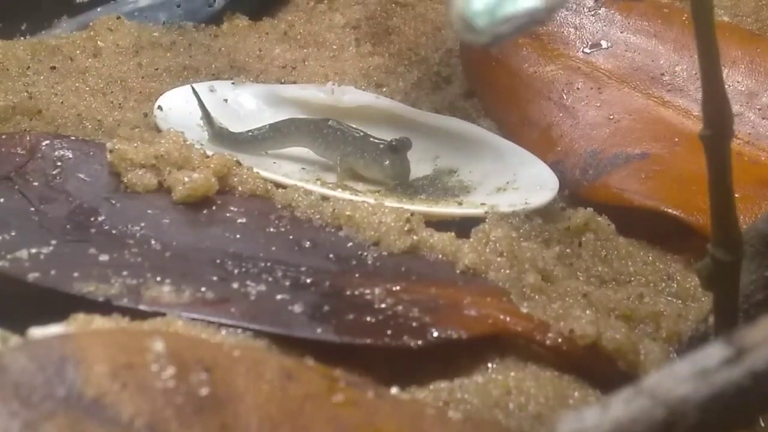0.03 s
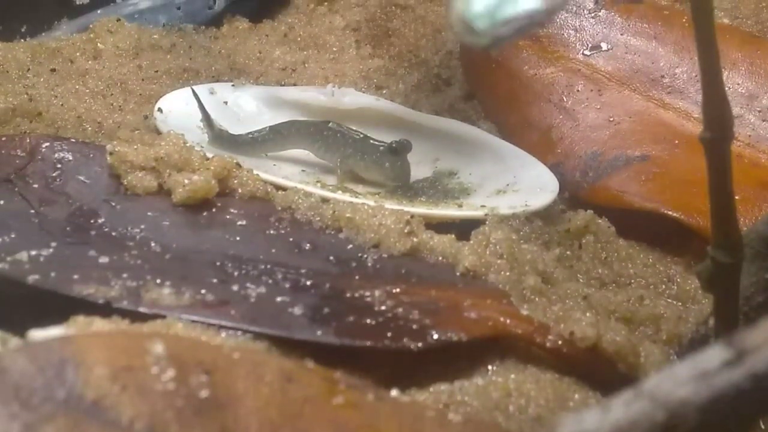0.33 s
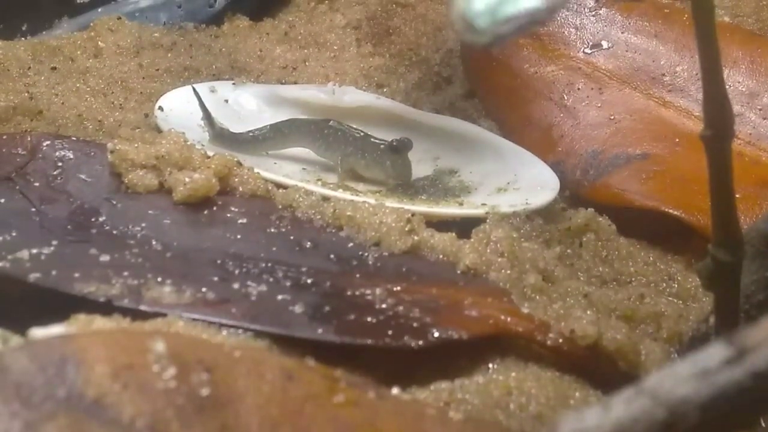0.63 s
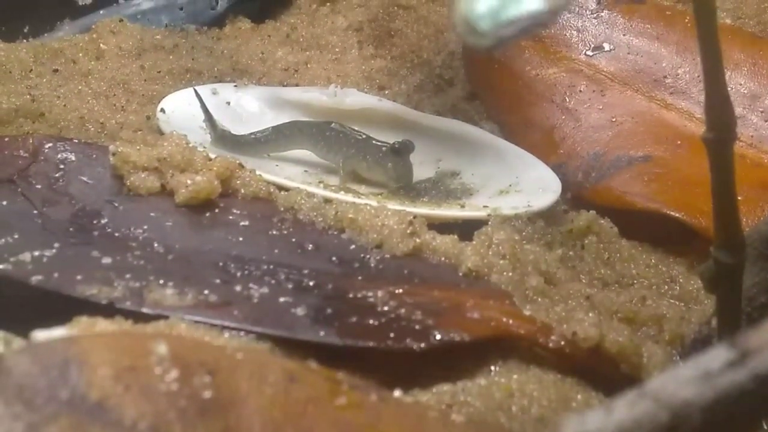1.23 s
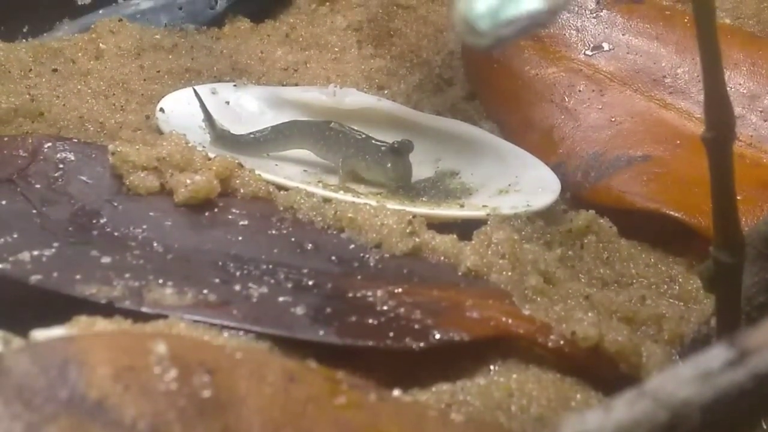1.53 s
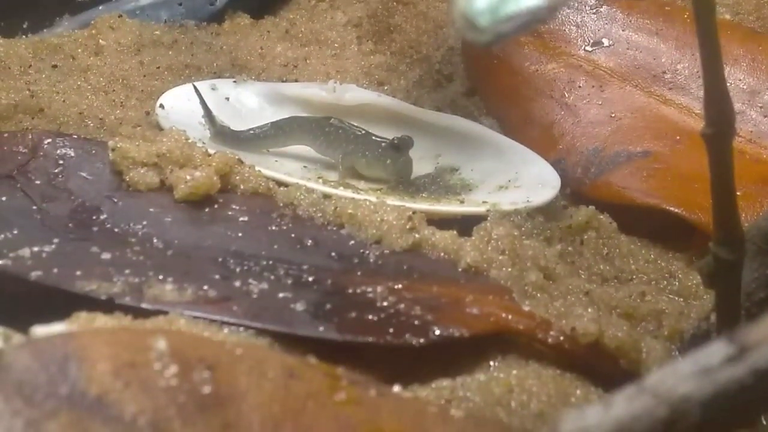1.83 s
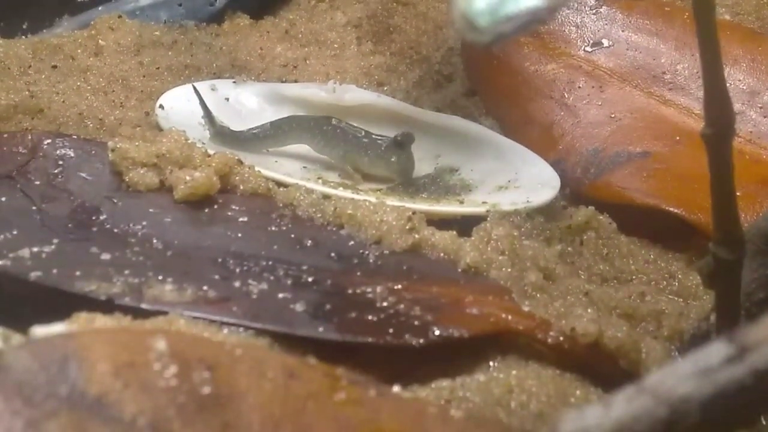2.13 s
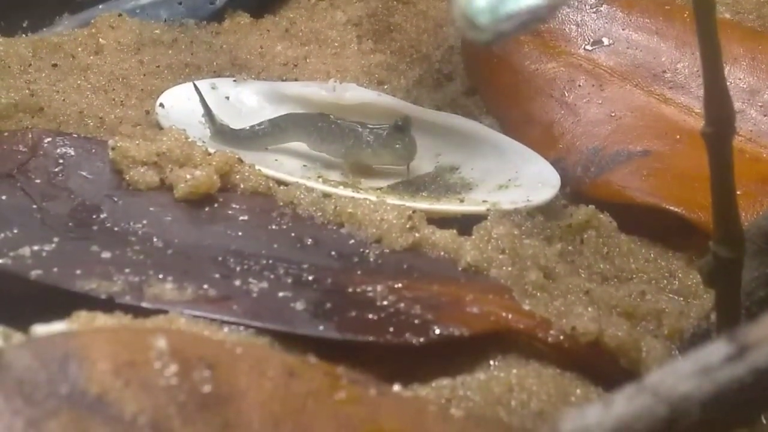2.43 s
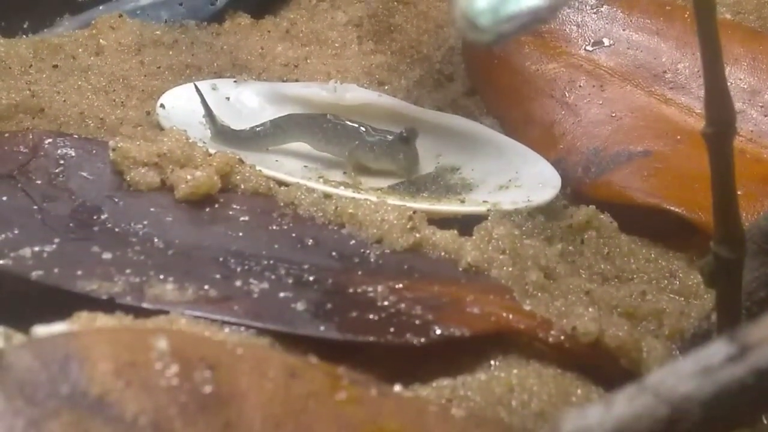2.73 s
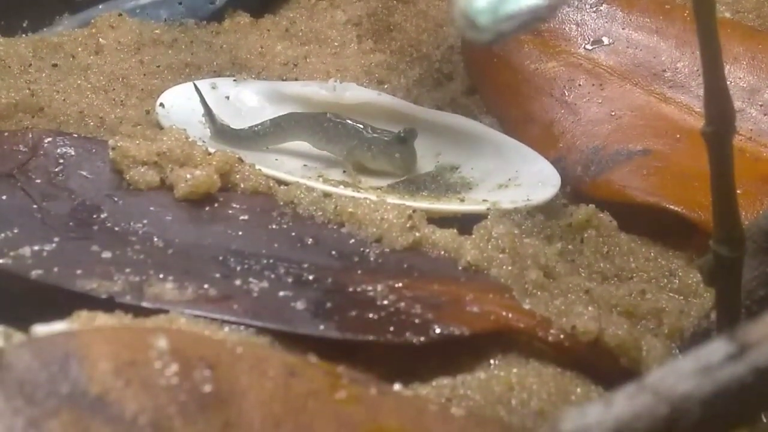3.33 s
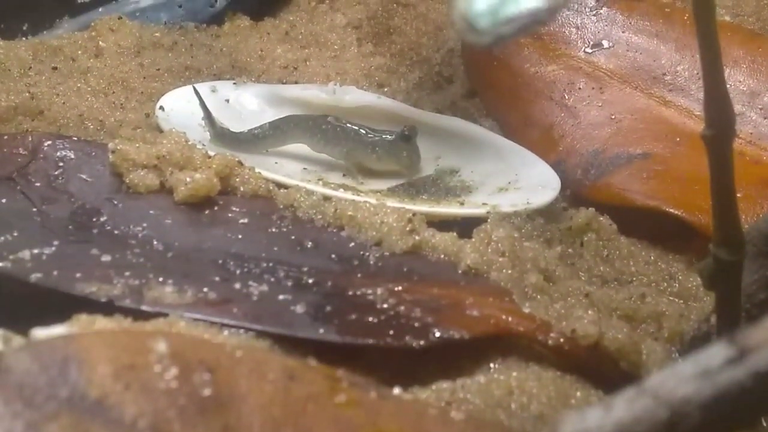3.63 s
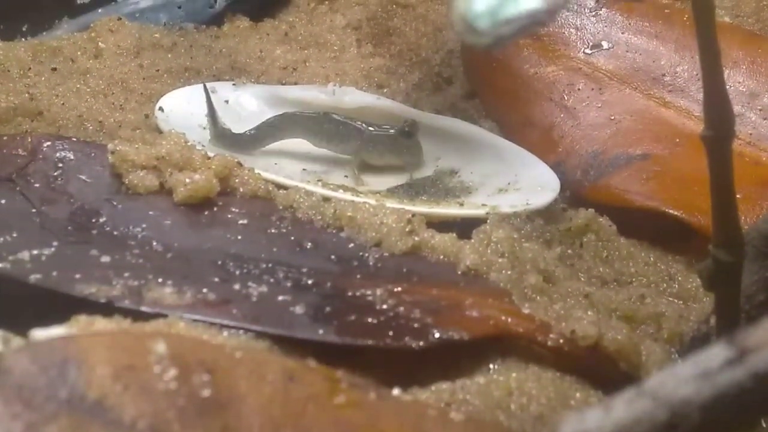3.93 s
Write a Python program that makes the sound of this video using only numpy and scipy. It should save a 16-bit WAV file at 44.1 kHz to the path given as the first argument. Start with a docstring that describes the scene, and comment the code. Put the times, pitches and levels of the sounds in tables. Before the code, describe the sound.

A steady rush of air and low motor hum, with one small click, in a quiet room.

```python
"""From the start, electric pumps or fans hum under a steady rush of turbulent air in a quiet room.
Motor tones beat slowly against the mains hum. The camera widens the stereo picture of the rush's
treble by feeding each side, late and inverted, into the other.
At 1.6 s one small click sounds close by, a snap with a damped knock; two fainter ticks follow
at 3.1 and 3.4 s, while the rush and hum carry on to the end."""
import sys
import numpy as np
from scipy import signal
from scipy.fft import rfft, irfft
from scipy.io import wavfile
from scipy.ndimage import uniform_filter1d

SR = 44100
rng = np.random.default_rng(int(sys.argv[2]) if len(sys.argv) > 2 else 0)


def transcribe(u):
    """Save the signal u as a 16-bit wav file named by the first command-line argument.

    u: samples, shape (n,) or (channels, n), limited to [-1, 1]; the rate is SR.
    q: integer samples, one column per channel.
    """
    v = np.clip(np.atleast_2d(u).T, -1, 1)
    q = np.round(v * 32767).astype(np.int16)
    wavfile.write(sys.argv[1], SR, q)


N = 176400


def gain_of(db):
    """Amplitude grows tenfold for every 20 decibels."""
    return 10 ** (np.asarray(db) / 20)


def unit_rms(x):
    """Division by the root mean square gives a signal unit power."""
    return x / np.sqrt(np.mean(x ** 2) + 1e-20)


def curve_at(points, hz):
    """Interpolation on a logarithmic frequency axis, as the ear hears pitch by ratio."""
    points_hz, values = np.transpose(points)
    return np.interp(np.log(hz + 1), np.log(points_hz + 1), values)


def pan_gains(pan_db):
    """Constant-power panning: two gains, the left pan_db above the right."""
    pair = np.array([gain_of(pan_db / 2), gain_of(-pan_db / 2)])
    return pair / np.sqrt(np.mean(pair ** 2, axis=0))


def drift(top_hz, t):
    """Slow sinusoids of random phase superpose into a wandering of unit power."""
    rates_hz = top_hz * np.geomspace(1 / 10, 1, 20)
    coarse_t = np.linspace(0, t[-1], 400)
    wander = sum(np.sin(2 * np.pi * (hz * coarse_t + rng.random())) for hz in rates_hz)
    return np.interp(t, coarse_t, unit_rms(wander))


def stereo_coherence(hz, widen_from_hz=820, squareness=1.08, quadrature=0.53):
    """Complex left-right coherence: the room sets the bass; delayed cross-feed combs the treble."""
    # likeness of the two sides in the room's bass: frequency_hz, correlation
    room_correlation = [(30, 0.54), (70, 0.85), (100, 0.8), (160, 0.87), (205, 0.17), (260, 0.84),
                        (350, 0.78), (440, 0.77), (530, 0.068), (600, 0.87), (700, 0.57), (900, 0.58)]
    # depth of the ripple that the widening gives: frequency_hz, depth
    comb_depth = [(900, 0.86), (2000, 0.9), (3100, 0.91), (5000, 0.84), (8000, 0.48), (13000, 0.5)]
    # lateness of the cross-feed between the sides: frequency_hz, delay_s
    cross_delay = [(900, .00052), (1450, .00053), (2050, .000495), (2450, .000503), (3500, .000485)]
    lag_rad = 2 * np.pi * hz * curve_at(cross_delay, hz)
    in_phase = np.tanh(squareness * np.cos(lag_rad)) / np.tanh(squareness)
    comb = -in_phase - 1j * quadrature * np.sin(lag_rad)  # negative: the feed is inverted
    coherence = np.where(hz < widen_from_hz, curve_at(room_correlation, hz), curve_at(comb_depth, hz) * comb)
    return coherence / np.maximum(abs(coherence), 1)


def turbulence(air, depth_db=0.7, frame=512):
    """Turbulence modulates the flow noise: patches of its spectrum come and go a little."""
    spectra = signal.stft(air, nperseg=frame)[2]
    patches = rng.standard_normal(spectra.shape[1:])
    patches = uniform_filter1d(patches, size=9, axis=0)  # smooth across frequency
    patches = uniform_filter1d(patches, size=12, axis=1)  # and across time
    return signal.istft(spectra * gain_of(depth_db * unit_rms(patches)), nperseg=frame)[1][:, :N]


def air_rush(t, trim_db=-0.22, swell_db=0.16):
    """Turbulent air radiates broadband noise, which arrives from all around, only partly coherent."""
    # spectrum of the moving air before the trim: frequency_hz, density_db_per_hz
    air_spectrum = [(20, -91.6), (45, -85.3), (75, -80.7), (95, -71.2), (135, -67.3), (175, -68.0),
                    (205, -73.4), (255, -68.1), (295, -69.6), (325, -64.4), (365, -67.0), (420, -69.2),
                    (580, -67.1), (720, -66.0), (900, -67.3), (1200, -72.7), (1480, -73.5), (1570, -70.7),
                    (1750, -75.5), (2030, -75.6), (2400, -79.4), (2700, -79.5), (3050, -83.2),
                    (3450, -84.9), (4500, -92.0), (5000, -95.0), (5750, -96.0), (6150, -100.2),
                    (7000, -101.7), (10200, -110.8), (11000, -110.8), (12300, -116.8), (14200, -119.3)]
    # where the rush sits: frequency_hz, left_minus_right_db
    air_pan = [(40, -10), (130, -7.5), (220, -2.5), (400, -3), (580, -1.5), (750, -0.5), (1200, 1.3),
               (1600, -2), (2200, 0.1), (10000, -1.2)]
    hz = np.fft.rfftfreq(N, 1 / SR)
    coherence = stereo_coherence(hz)
    left, independent = rfft(rng.standard_normal((2, N)))
    right = coherence * left + np.sqrt(np.maximum(1 - abs(coherence) ** 2, 0)) * independent
    colour = gain_of(curve_at(air_spectrum, hz) + trim_db) * np.sqrt(SR / 2)
    air = irfft(np.array([left, right]) * pan_gains(curve_at(air_pan, hz)) * colour, N)
    return turbulence(air) * gain_of(swell_db * drift(top_hz=6.2, t=t))


def motor_hum(t, waver_db=0.45, waver_rad=0.07, waver_hz=5):
    """Motor and mains tones interfere: close neighbours beat at their difference frequency."""
    # motor and mains tones: pitch_hz, level_db, left_minus_right_db, left_lead_rad
    tones = [(58.1, -50.4, -0.7, -0.3), (88.9, -62.8, -4.2, 0.5), (116.3, -48.0, -8.4, -0.5),
             (120.0, -47.3, -2.8, 0.5), (127.0, -54.8, -8.5, 0.4), (147.7, -44.5, -3.7, 0.1),
             (253.9, -60.0, -1.6, -0.4), (270.7, -52.4, -3.4, 0.1), (360.2, -53.1, -5.9, 0.2),
             (480.2, -58.5, -9.6, 0.7), (541.3, -61.2, -13.1, -2.8), (726, -60, 0, 0), (814, -61.5, 0, 0),
             (1047, -62, 0, 0)]
    hum = np.zeros((2, N))
    for pitch_hz, level_db, pan_db, lead_rad in tones:
        unsteadiness = pitch_hz / 120  # the waver depths hold at 120 Hz and grow with pitch
        phase = 2 * np.pi * (pitch_hz * t + rng.random())
        phase += unsteadiness * waver_rad * drift(waver_hz, t)
        amplitude = np.sqrt(2) * gain_of(level_db + unsteadiness * waver_db * drift(waver_hz, t))
        hum[0] += amplitude * gain_of(pan_db / 2) * np.sin(phase + lead_rad)
        hum[1] += amplitude * gain_of(-pan_db / 2) * np.sin(phase)
    return hum


def snap(t, scatter_db=6, scatter_t60_s=0.017):
    """An impulse and its brief scatter, coloured at minimum phase so that the onset stays sharp."""
    # spectrum of the snap: frequency_hz, relative_db
    snap_colour = [(60, -18), (220, 2), (520, 4), (750, 2), (1400, -11), (3200, -13.5), (4400, -23),
                   (5900, -24), (6700, -33.5), (9200, -36), (14000, -46)]
    hz = abs(np.fft.fftfreq(len(t), 1 / SR))
    log_gain = np.log(gain_of(curve_at(snap_colour, hz)))
    minimum_phase = np.exp(np.conj(signal.hilbert(log_gain)))
    pulse = -np.fft.ifft(minimum_phase).real
    scatter = rng.standard_normal((2, len(t))) * gain_of(-60 * t / scatter_t60_s)
    scatter *= gain_of(scatter_db) / np.linalg.norm(scatter[0])
    scatter[:, 0] += 1  # the direct impulse
    return signal.fftconvolve(scatter, pulse[None] / np.linalg.norm(pulse), axes=1)[:, :len(t)]


def knock(t, rise_s=0.0005):
    """Damped free vibration: the low modes of the clicking object die away exponentially."""
    # dull modes of the object: pitch_hz, relative_db, t60_s
    modes = [(240, 3, .07), (360, 0, .04), (540, 5, .012)]
    attack = 1 - np.exp(-t / rise_s)
    sound = np.zeros(len(t))
    for pitch_hz, relative_db, t60_s in modes:
        ring = -np.cos(2 * np.pi * pitch_hz * t) * gain_of(-60 * t / t60_s) * attack
        sound += gain_of(relative_db) * ring / np.linalg.norm(ring)
    return sound


def scene():
    """Sound pressures add: rush and hum throughout, then three clicks, each a snap with a knock."""
    # small clicks close by: start_s, gain_db, left_minus_right_db
    clicks = [(1.6122, -13, -.5), (3.0836, -25, -.5), (3.3655, -22, -.5)]
    t = np.arange(N) / SR
    mix = air_rush(t) + motor_hum(t)
    click_t = t[:4096]
    for start_s, gain_db, pan_db in clicks:
        click = snap(click_t) + knock(click_t)
        start = round(start_s * SR)
        mix[:, start:start + len(click_t)] += gain_of(gain_db) * pan_gains(pan_db)[:, None] * click
    return mix


def record(dry):
    """Band limiting: a linear-phase low-pass filter removes the highest treble."""
    low_pass = signal.firwin(511, cutoff=14280, window=("kaiser", 9), fs=SR)
    return signal.oaconvolve(dry, low_pass[None], "same")


dry = scene()
out = record(dry)
transcribe(out)
```